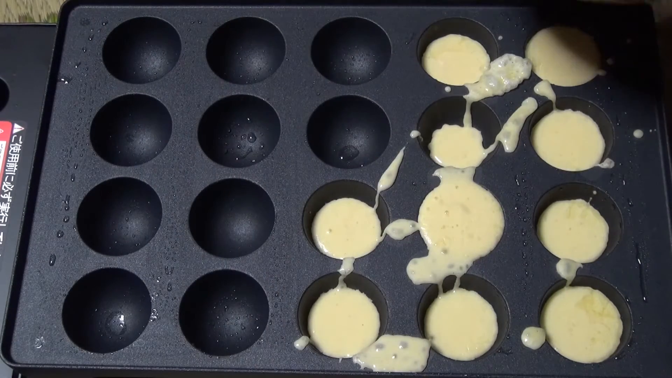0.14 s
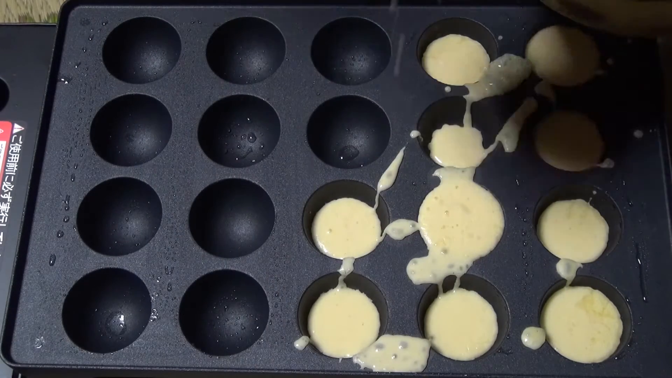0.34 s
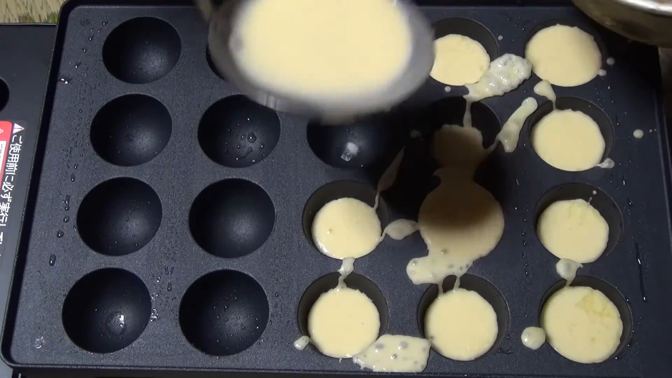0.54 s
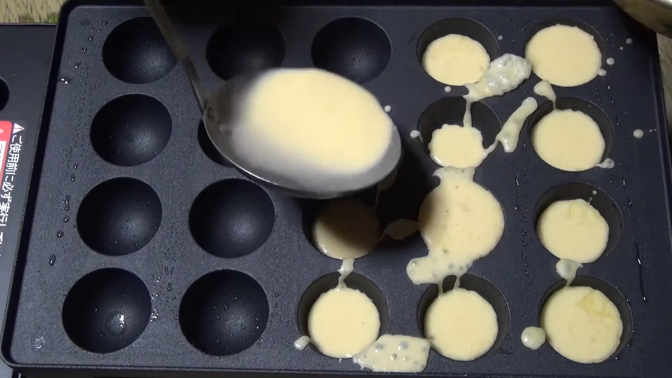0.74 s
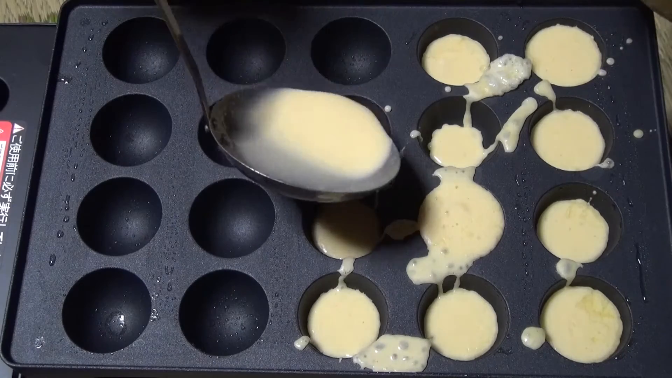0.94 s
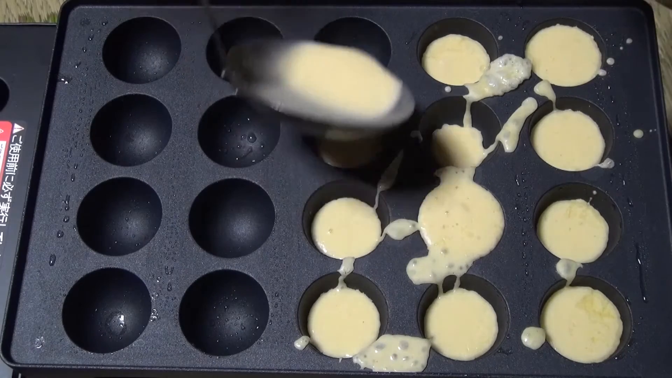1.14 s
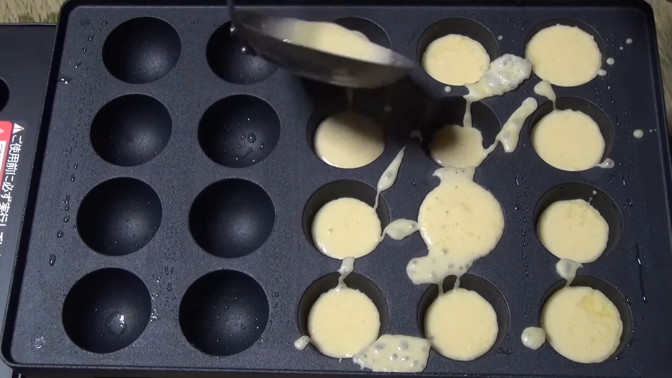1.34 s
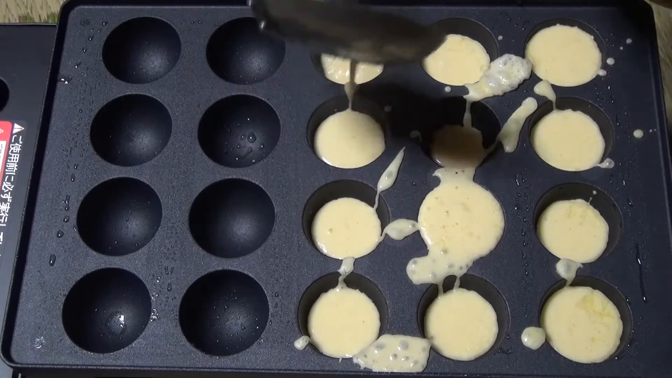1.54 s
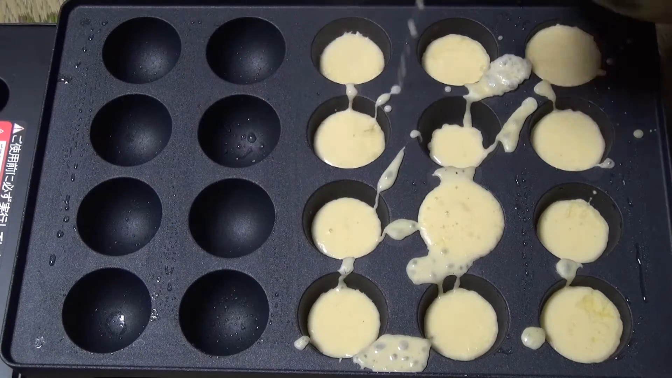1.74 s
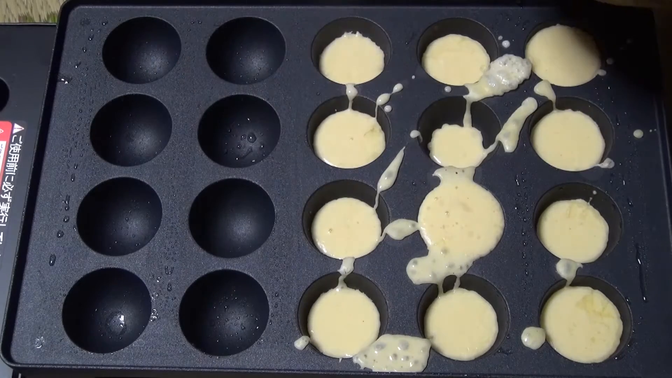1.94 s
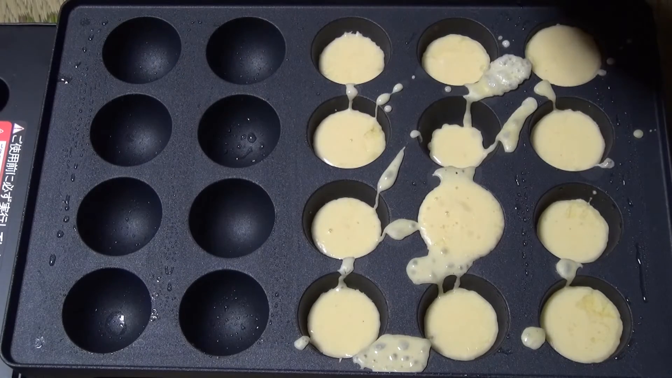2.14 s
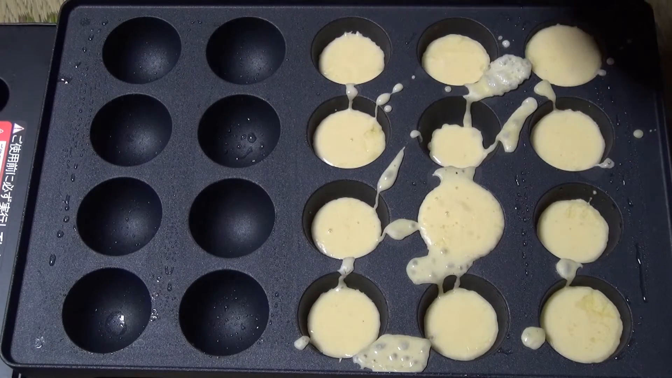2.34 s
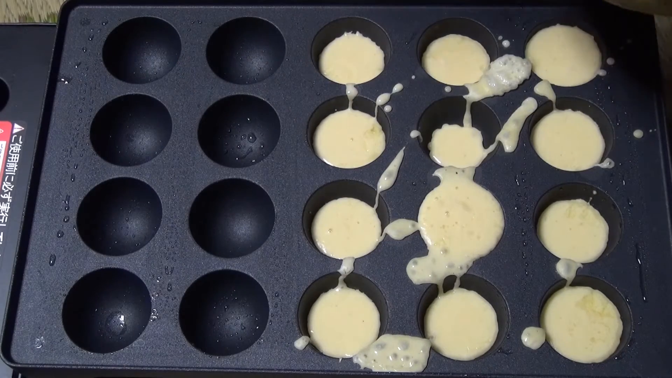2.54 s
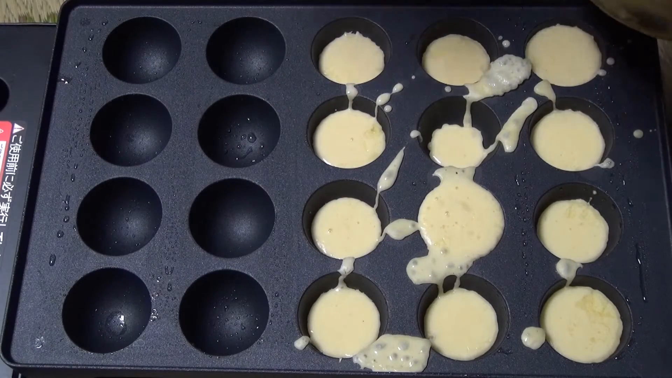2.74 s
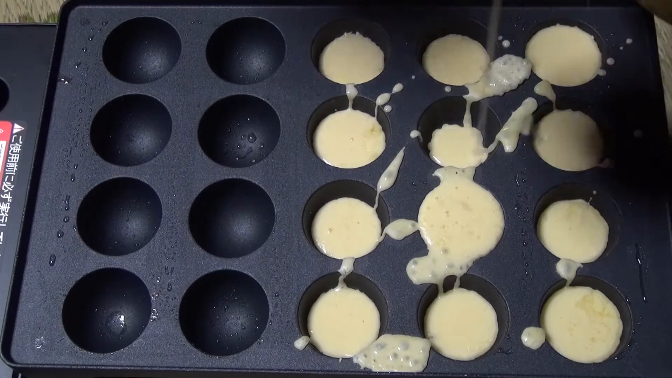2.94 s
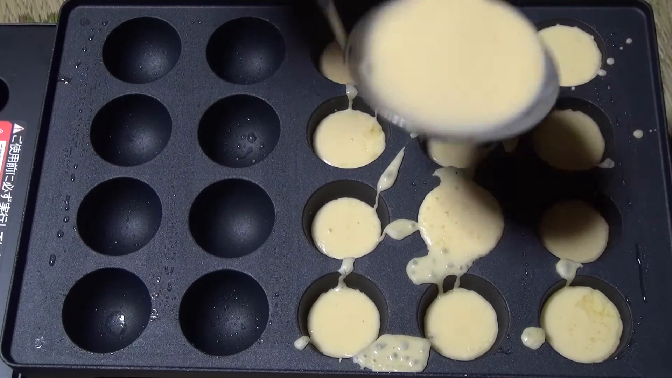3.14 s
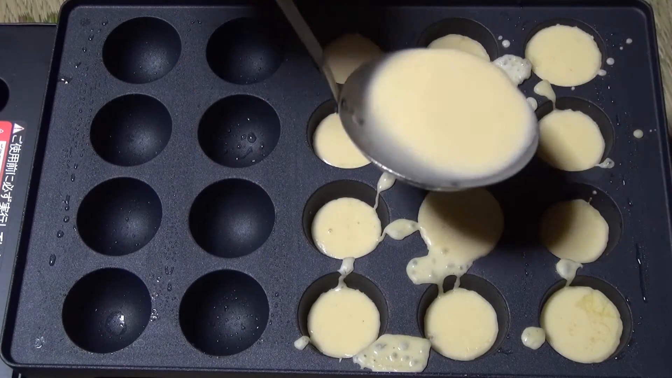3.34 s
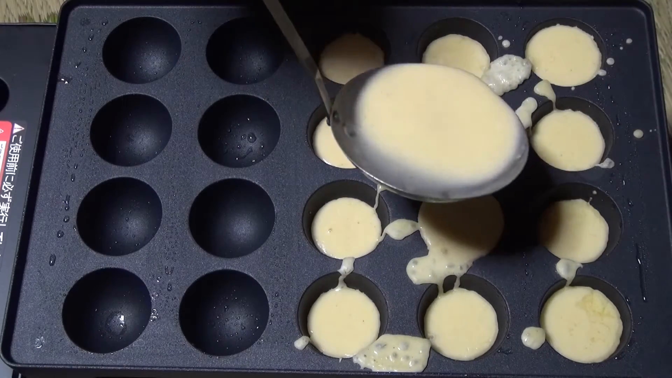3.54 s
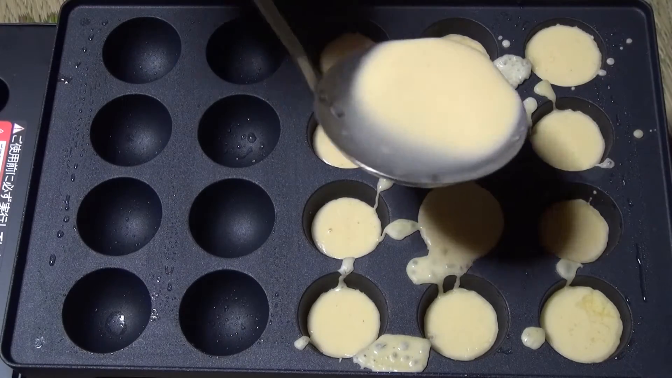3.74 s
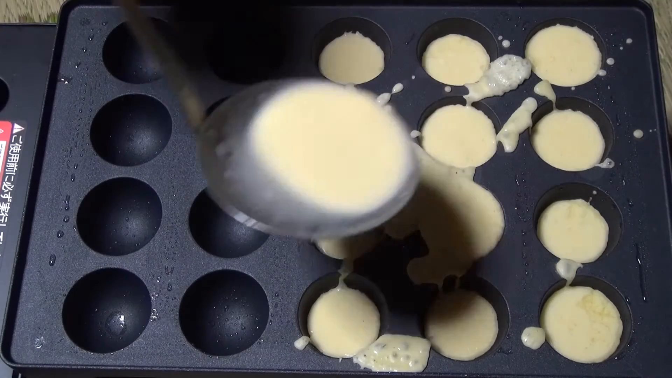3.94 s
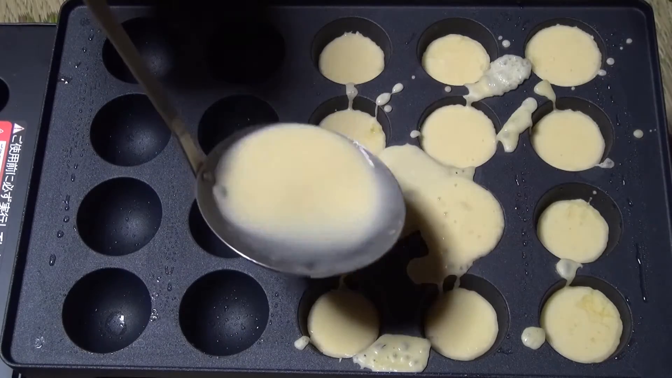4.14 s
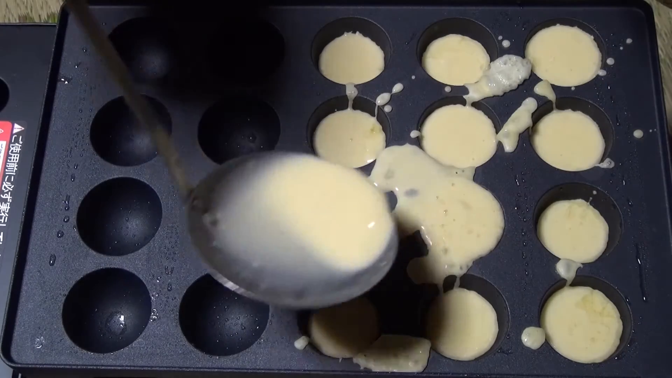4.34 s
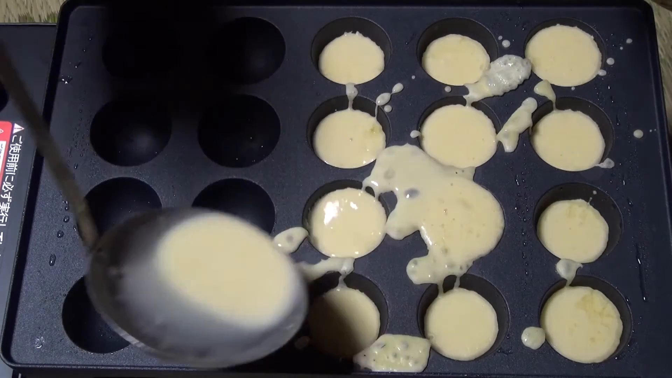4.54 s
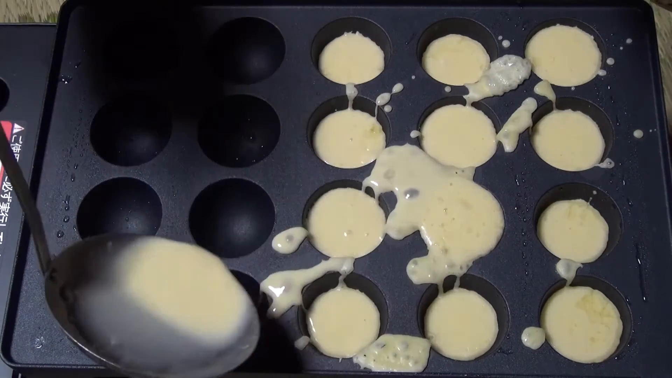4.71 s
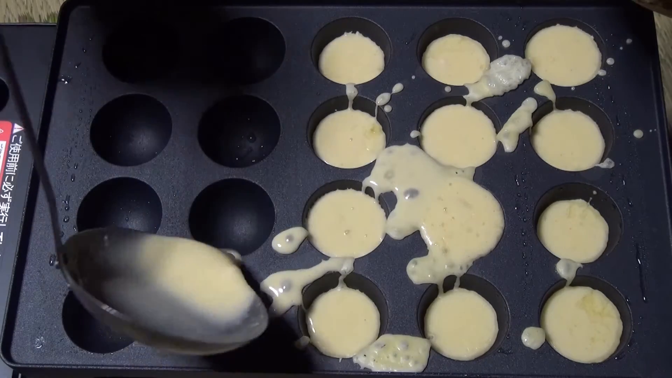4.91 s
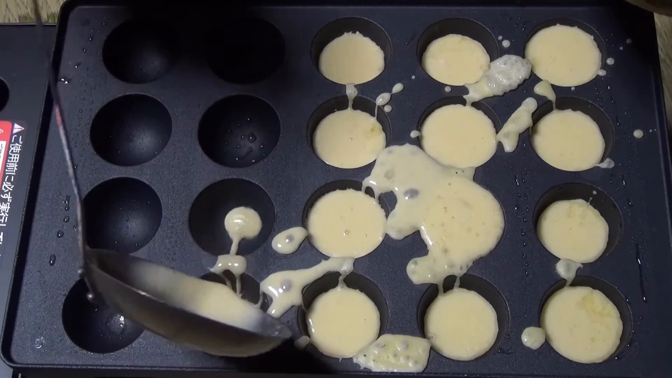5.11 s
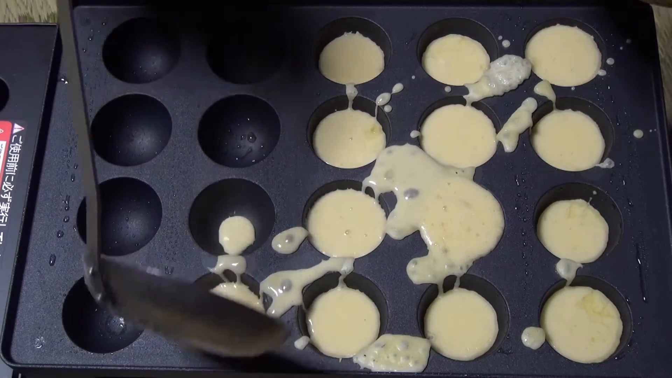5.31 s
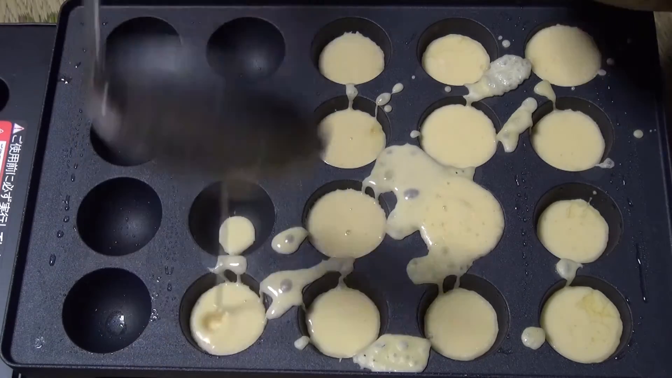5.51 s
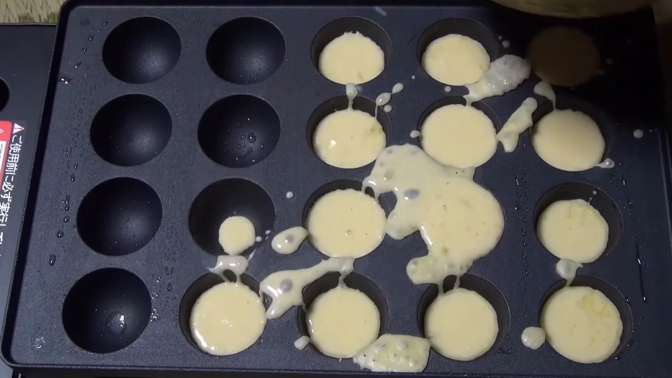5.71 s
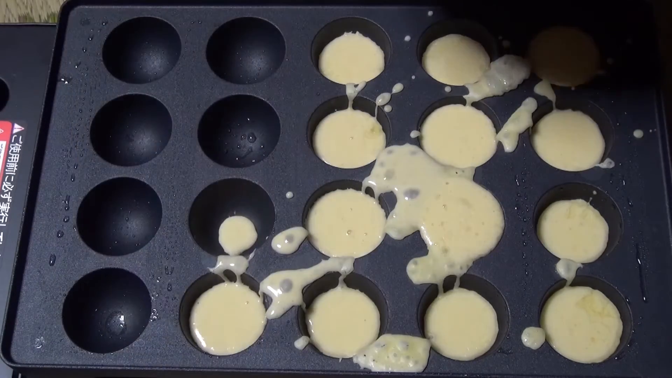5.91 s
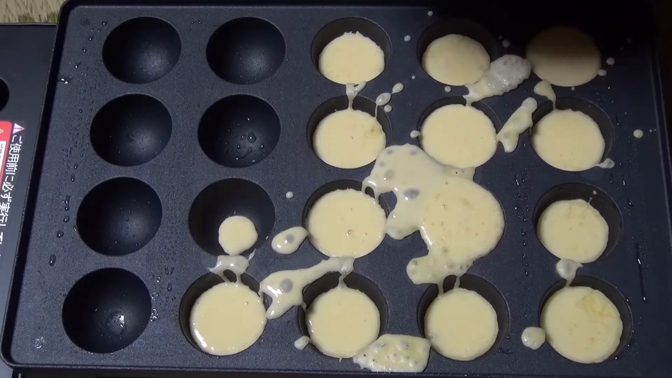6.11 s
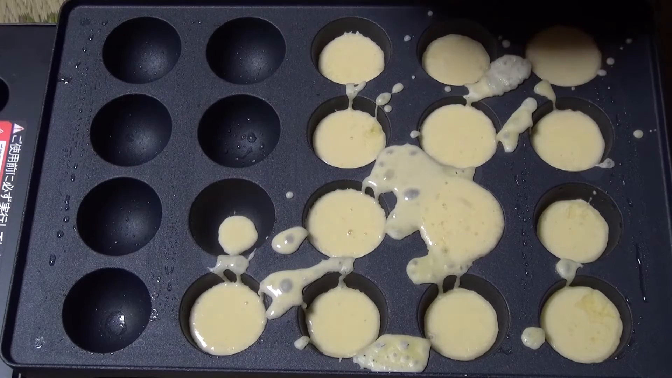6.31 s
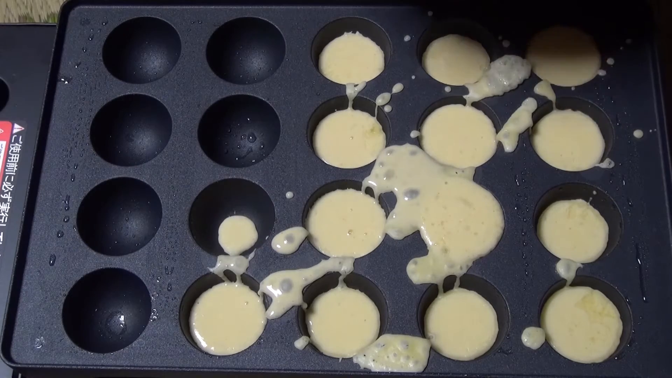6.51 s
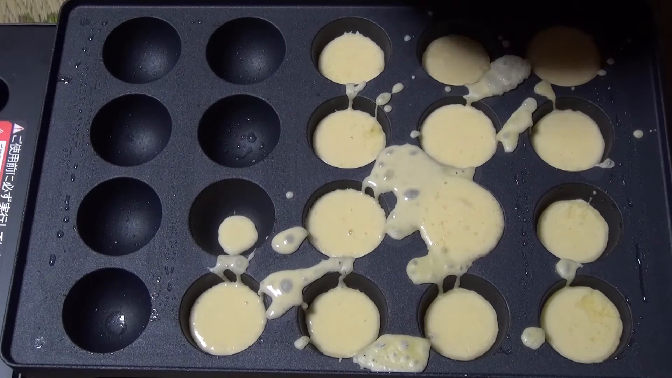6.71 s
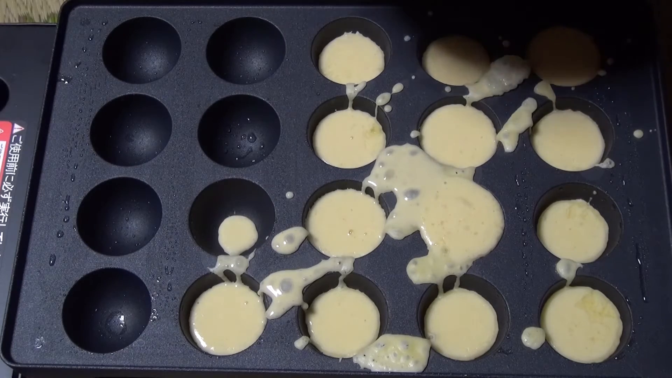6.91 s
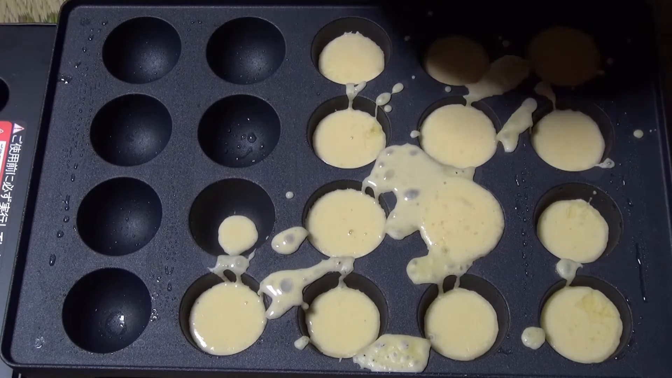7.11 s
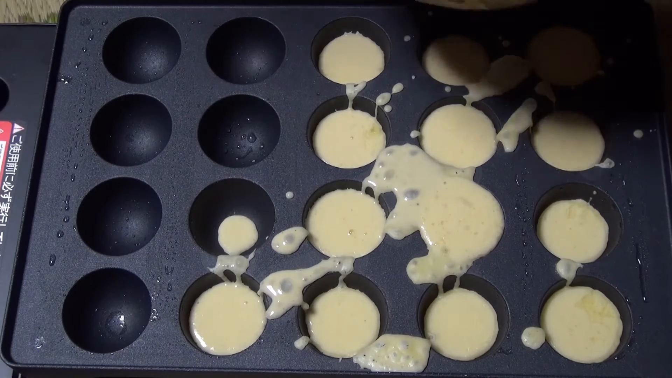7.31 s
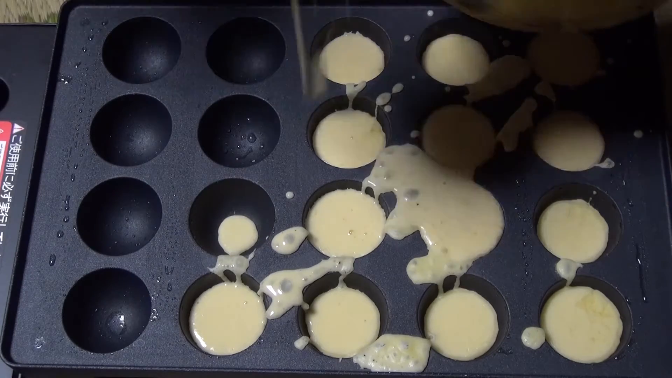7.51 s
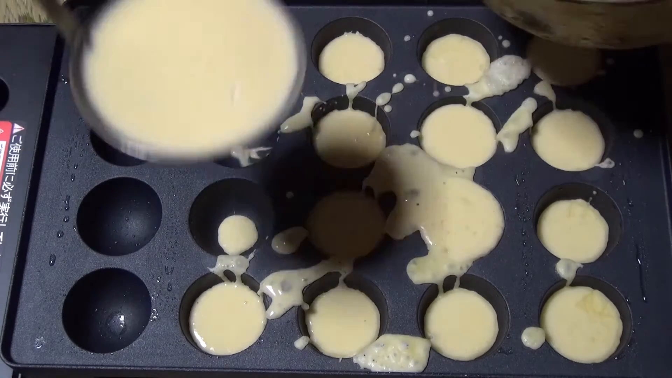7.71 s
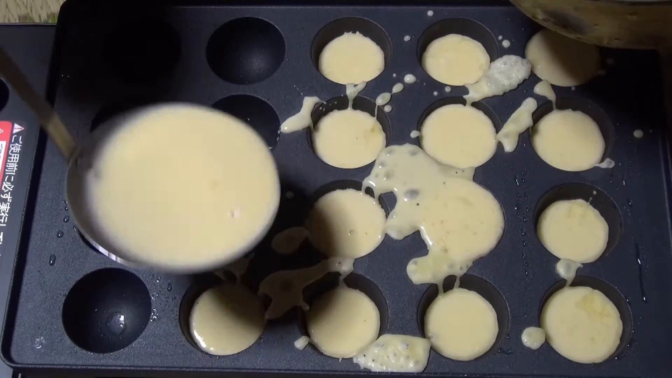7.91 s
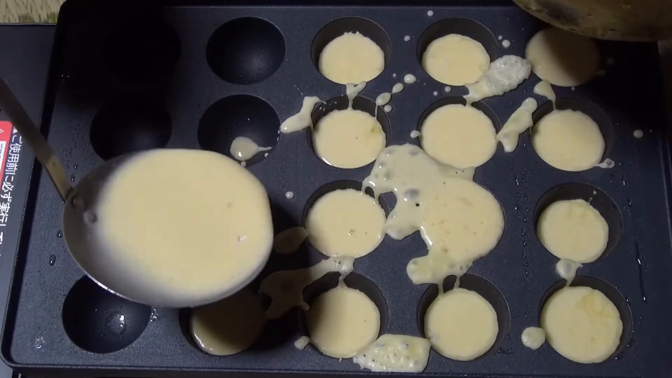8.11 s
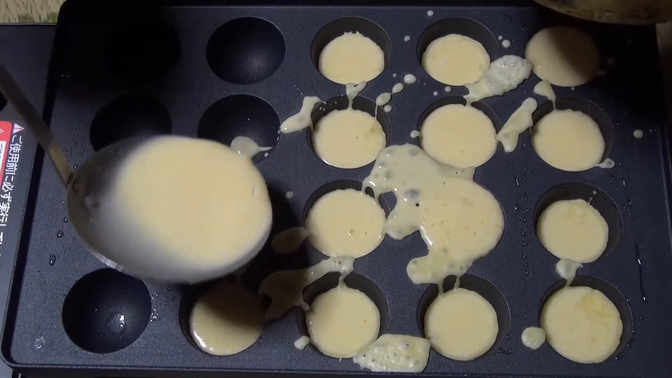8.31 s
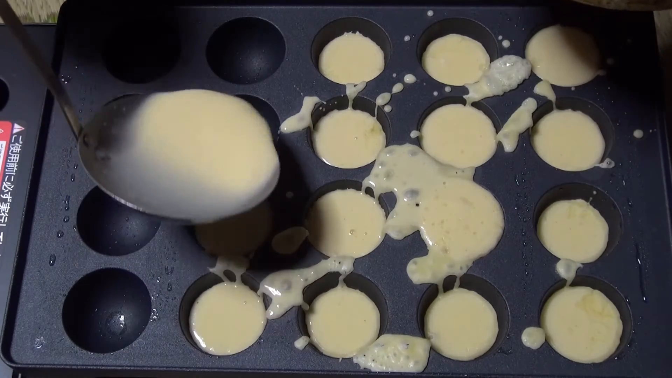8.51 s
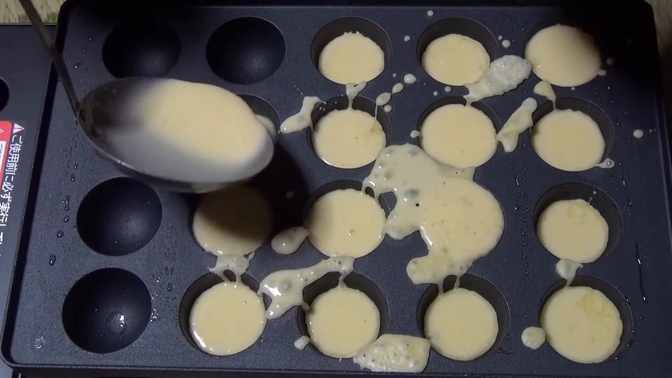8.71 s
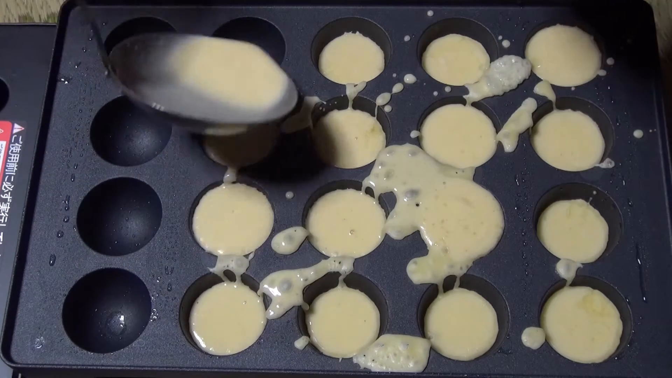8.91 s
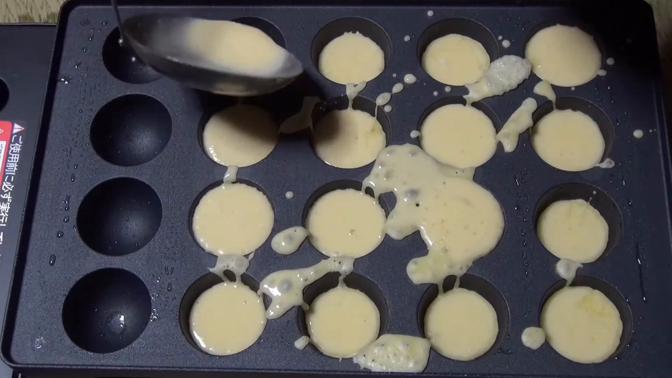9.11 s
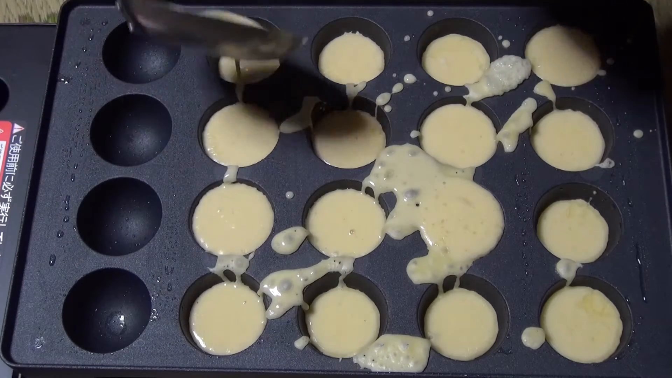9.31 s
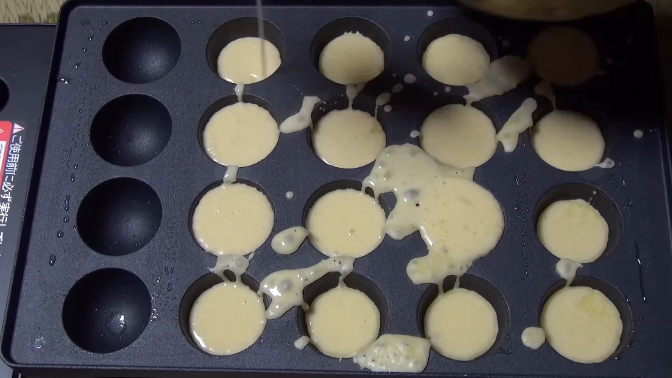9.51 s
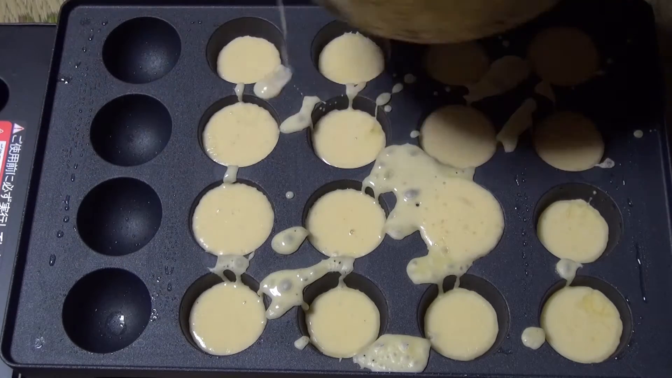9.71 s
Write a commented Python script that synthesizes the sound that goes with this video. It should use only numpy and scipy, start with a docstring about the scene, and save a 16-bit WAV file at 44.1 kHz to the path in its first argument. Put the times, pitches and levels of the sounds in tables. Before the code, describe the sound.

Close to a hot cooking plate in a small kitchen, a fading sizzle surges as batter is poured into oiled cups, then thins to scattered spits. A ladle clanks into a metal bowl and its handle knocks the rim. A second run of pours sizzles, quiet returns with a duller ladle landing and handle knock, then a last wet, fierce sizzle swells. Close, nearly dry microphone, faint low room rumble.

```python
"""A close sizzle is already dying away when batter is ladled into the hot oiled cups of a cooking plate.
Steam bubbles burst as fizz and wet sputter and ring the cups; the sizzle swells with each pour and
thins to single spits of oil. Filtered random bursts make the bubbles, sharp spikes the spits.
The ladle lands in a metal mixing bowl and its handle falls against it, as clicks and decaying modes.
Sparse reflections of a small kitchen and a low rumble lie behind."""
import sys
import numpy as np
from scipy import signal
from scipy.fft import rfft, irfft
from scipy.io import wavfile
from scipy.ndimage import uniform_filter1d

SR = 44100
rng = np.random.default_rng(int(sys.argv[2]) if len(sys.argv) > 2 else 0)


def to_wav(s):
    """Save 16-bit WAV."""
    ch = np.atleast_2d(s).T  # columns
    pcm = np.round(np.clip(ch, -1, 1) * 32767)  # PCM
    wavfile.write(sys.argv[1], SR, pcm.astype(np.int16))


N = 429975  # length in samples


def gain_of(db):
    """Decibels to amplitude."""
    return 10 ** (np.asarray(db) / 20)


def evened(x):
    """Scales to rms 1."""
    return x / np.sqrt(np.mean(x ** 2) + 1e-20)


def read(points, hz):
    """Joins (Hz, value) points on a log-frequency axis."""
    f, value = np.transpose(points)
    return np.interp(np.log(hz + 1), np.log(f + 1), value)


def add(mix, s, sound):
    """Mixes a sound in at a time in seconds."""
    part = mix[max(round(s * SR), 0):][:len(sound)]
    part += sound[:len(part)]


def coloured(x, points):
    """Minimum-phase filter with the given spectrum, so clicks keep their sharp fronts; rms 1."""
    hz = abs(np.fft.fftfreq(8192, 1 / SR))
    log_gain = np.log(gain_of(read(points, hz)))
    response = np.exp(np.conj(signal.hilbert(log_gain)))
    impulse = np.fft.ifft(response).real[:4096]
    return evened(signal.oaconvolve(x, impulse)[:len(x)])


def resonate(x, hz, width):
    """One damped resonance, width in Hz."""
    return signal.lfilter([1], [1, -np.exp((2j * np.pi * hz - np.pi * width) / SR)], x).real


def drift(per_s):
    """Slow random curve of rms 1, straight lines between per_s random points a second."""
    at = np.arange(N) * per_s / SR
    return evened(np.interp(at, np.arange(N // 10), rng.standard_normal(N // 10)))


def click(hz, width, decay_s):
    """A brief broad crack of peak 1 with a sharp front."""
    t = np.arange(SR // 40) / SR
    burst = rng.choice([-1, 1], len(t)) * np.exp(-t / decay_s)
    crack = resonate(np.diff(burst, prepend=0), hz, width)
    return crack / abs(crack).max()


def air():
    """Low room rumble with a faint mains hum."""
    # Spectrum of the kitchen air. Each row: frequency in Hz, relative density in dB per Hz.
    rumble_colour = [(20, -17), (40, -9), (60, -1), (80, 0), (105, 1.5), (150, -1), (210, -6.5),
                     (300, -10.5), (450, -12), (800, -20.5), (3000, -25)]
    rumble_db, hum_hz, hum_db = -54, 59, -68.5  # rms levels
    rumble = gain_of(rumble_db) * coloured(rng.standard_normal(N), rumble_colour)
    hum = np.sqrt(2) * np.sin(2 * np.pi * hum_hz * np.arange(N) / SR)
    return rumble + gain_of(hum_db) * hum


def kitchen(x):
    """Sparse reflections off the kitchen, after a 4 ms gap, each band dying at its own speed."""
    # Reverberation of the room. Each row: frequency in Hz, time to fall 60 dB in seconds.
    room_decay = [(200, 0.1), (1000, 0.23), (4000, 0.17), (14000, 0.042)]
    size = SR // 2
    sparse = rng.random(size) < 3000 / SR  # about 3000 reflections a second
    late = np.arange(size) > .004 * SR
    echoes = rng.standard_normal(size) * sparse * late
    hz, t, z = signal.stft(echoes, SR, nperseg=256)
    fading = gain_of(-60 * t / read(room_decay, hz)[:, None])
    tail = signal.istft(z * fading, SR, nperseg=256)[1]
    return signal.oaconvolve(x, tail / np.linalg.norm(tail))[:N]


def plate_room(x, count=4):
    """Bubbles burst all over the plate, so each reaches the walls by one of several paths."""
    spot = rng.integers(0, count, N // 64 + 1)[np.arange(N) // 64]
    shares = [np.sqrt(abs(uniform_filter1d((spot == k) * 1.0, size=32))) for k in range(count)]
    return sum(kitchen(x * share) for share in shares)


def taps():
    """Soft contacts of ladle and batter: one damped tone with a short scuff round it."""
    # Light taps and plops. Each row: start in seconds, level in dB before the tone and scuff shares,
    # pitch in Hz, time to fall 60 dB in seconds.
    soft_contacts = [(1.155, -24.5, 900, .018), (2.143, -32, 686, 0.054), (2.951, -36, 390, .06),
                     (3.84, -22, 1100, 0.015), (5.156, -17.5, 920, .016), (6.6839, -16.5, 1585, 0.025),
                     (6.995, -38, 350, 0.063)]
    out, t = np.zeros(N), np.arange(SR // 4) / SR
    for s, db, hz, t60 in soft_contacts:
        narrowed = resonate(rng.standard_normal(len(t)), hz, 0.65 * hz)
        narrowed = resonate(narrowed, hz, 0.65 * hz)
        scuff = evened(narrowed) * np.exp(-t / .007)
        tone = np.sin(2 * np.pi * hz * t)
        add(out, s, gain_of(db - 60 * t / t60) * (0.33 * tone + 0.12 * scuff))
    return out


def clinks(blows, modes, click_s, clatter_t60):
    """Each blow is a metal click, a short clatter and the body's modes, weighted by the place hit."""
    # Crowded weak modes of thin metal. Each row: frequency in Hz, relative density in dB per Hz.
    clatter_colour = [(150, -23), (300, 1.5), (1000, 2.5), (1500, -5), (2400, 6), (4000, 5), (8000, -37),
                      (15000, -11)]
    out, t = np.zeros(N), np.arange(SR // 2) / SR
    for s, db, place, ring, click_db, click_hz, clatter_db in blows:
        add(out, s, gain_of(click_db) * click(click_hz, width=1700, decay_s=click_s))
        clatter = coloured(rng.standard_normal(len(t)), clatter_colour)
        add(out, s, gain_of(clatter_db - 60 * t / clatter_t60) * clatter)
        for hz, t60, first_db, second_db in modes:
            mode_db = db + first_db + (second_db - first_db) * np.clip(place, 0, 1)
            decay = gain_of(mode_db - 60 * t / (ring * t60))
            swell = 1 - np.exp(-t * hz / 0.5)  # low modes take longer to get going
            add(out, s, decay * swell * np.sin(2 * np.pi * hz * t))
    return out


def ladle_landings():
    """The ladle drops into the bowl and rings in its own modes."""
    # Modes of the ladle. Each row: frequency in Hz, time to fall 60 dB in seconds before the ring factor,
    # relative level in dB struck on the lip, relative level in dB struck on the belly.
    ladle_modes = [(578, 0.28, -67, -38), (800, 0.21, -43, -29.5), (874, 0.25, -38.5, -38),
                   (1305, 0.13, -38, -36), (1554, 0.059, -35, -31), (1565, 0.1, -23.5, -46),
                   (1670, 0.042, -27, -29), (2120, 0.3, -36, -53), (2190, 0.045, -31, -26),
                   (2350, 0.029, -17.5, -29), (2400, 0.18, -31, -50), (2950, 0.08, -25, -52),
                   (3480, .03, -41, -22), (3850, 0.062, -26.5, -38), (7100, .03, -20, -60)]
    # Landings. Each row: start in seconds, level of the modes in dB, place from 0 lip to 1 belly,
    # ring time factor, click peak in dB, click centre in Hz, starting clatter level in dB.
    landings = [(2.366, 1.5, 0.076, 0.95, -8.5, 4940, -27.5), (6.0212, 2, 0.85, 0.87, -28, 2600, -47)]
    return clinks(landings, ladle_modes, click_s=0.0028, clatter_t60=0.18)


def handle_knocks():
    """The ladle's handle falls against the bowl, which rings in its modes."""
    # Modes of the bowl. Each row: frequency in Hz, time to fall 60 dB in seconds before the ring factor,
    # relative level in dB struck on the rim, relative level in dB struck on the wall.
    bowl_modes = [(242, 0.044, -48, -34), (365, 0.06, -40, -24.5), (475, 0.34, -28, -32),
                  (510, 0.063, -30, -17.5), (730, 0.23, -44, -39.5), (832, 0.2, -41, -38),
                  (930, 0.16, -48, -32), (1520, 0.059, -17.5, -42), (1556, 0.044, -16, -28),
                  (1610, .13, -43, -37), (2067, 0.2, -23.5, -57.5), (2215, 0.097, -27, -43.5),
                  (2290, 0.04, -34.5, -19), (2950, 0.098, -31, -37.5), (3640, 0.026, -22, -25),
                  (4600, 0.021, -24, -20), (6900, 0.014, -23, -36)]
    # Knocks. Each row: start in seconds, level of the modes in dB, place from 0 rim to 1 wall,
    # ring time factor, click peak in dB, click centre in Hz, starting clatter level in dB.
    knocks = [(2.5922, 1, 0.058, 0.92, -17.5, 2500, -23), (6.3292, -2.5, 1, 0.9, -9.5, 4500, -23.5)]
    return clinks(knocks, bowl_modes, click_s=0.0017, clatter_t60=0.062)


def spits():
    """Drops of water explode in the oil: a sharp pressure spike with a fainter ring of the cup."""
    # The loudest single spits. Each row: start in seconds, peak of the spike in dB, centre in Hz.
    loud_spits = [(0.3521, -12.5, 5850), (0.798, -9.5, 10200), (2.404, -11, 9640), (2.7797, -14, 9720),
                  (4.3646, -10, 9430), (6.4234, -16, 10100), (6.817, -19, 8160), (6.9388, -15.5, 8200),
                  (7.213, -18, 8270), (7.6034, -20.5, 9460)]
    # Range of the small spits: lowest and highest centre in Hz.
    low_hz, high_hz = (5000, 10300)
    small_per_s, small_db, spread_db = 11, -24, 4  # small ones come at random, within 4 dB either way
    ring_db = -7  # the cup's ring against the spike
    small_spits = []
    for when, size, pitch in rng.random((round(small_per_s * N / SR), 3)):
        level_db = small_db + spread_db * (2 * size - 1)
        small_spits.append((when * N / SR, level_db, low_hz + (high_hz - low_hz) * pitch))
    out, spike = np.zeros(N), signal.unit_impulse(SR // 100)
    for s, db, hz in loud_spits + small_spits:
        snap = resonate(np.diff(spike, prepend=0), hz, 3400)
        add(out, s, gain_of(db) * snap / abs(snap).max())
        add(out, s, gain_of(db + ring_db) * click(hz=3940, width=1700, decay_s=0.0014))
    return out


def bubbles(per_s, spread_db, clump_db, wash, burst_s, count=16):
    """Bursting bubbles of chance sizes, in flurries, over the wash of those too small to tell apart."""
    flurry = gain_of(clump_db * evened(drift(22) + drift(90) + drift(300)))
    growth = np.minimum(rng.exponential(1, N), 5.2)
    sizes = gain_of(spread_db * growth) * (rng.random(N) < per_s / SR)
    kind, t = rng.integers(0, count, N), np.arange(SR // 200) / SR
    shapes = rng.standard_normal((count, len(t))) * np.exp(-t / burst_s)  # each film tears in its own way
    shapes += 2.2 * (t == 0)  # after a sharp first snap
    shapes = [evened(shape) for shape in shapes]
    pops = sum(signal.oaconvolve(sizes * (kind == k), shape)[:N] for k, shape in enumerate(shapes))
    mean_colour = np.sqrt(np.mean(abs(rfft(shapes, N)) ** 2, axis=0))
    pops = irfft(rfft(pops) / mean_colour, N)  # white taken together
    return evened(flurry * (evened(pops) + wash * rng.standard_normal(N)))


def hollows():
    """Bubbles inside a half-closed pocket of air take on its pitch, which rises until it fills."""
    # Hollows between batter, cup and ladle. Each row: start in seconds, end in seconds, starting pitch
    # in Hz, width in Hz of each of two stacked resonances, rms level in dB before the fades.
    pockets = [(0.4, 1.36, 3520, 260, -43), (0.776, 1.25, 2930, 380, -43), (1.22, 2.397, 2670, 550, -50),
               (3.294, 3.838, 654, 500, -51.5), (3.424, 3.8, 5300, 700, -40.5),
               (3.95, 4.65, 3040, 380, -47.5), (4.56, 5.0, 3980, 800, -44),
               (4.716, 5.66, 7690, 1100, -38.5), (7.62, 8.3, 3190, 300, -44.5),
               (8.08, 9.1, 1830, 520, -48.5), (9.03, 9.33, 2300, 1400, -38.5),
               (9.03, 9.5, 2950, 900, -44.5), (9.25, 9.85, 4450, 1100, -38.5)]
    rise_per_s = .11  # share by which the pitch climbs as the hollow shrinks
    out = np.zeros(N)
    steam = bubbles(per_s=2300, spread_db=-3.0, clump_db=2.9, wash=0.97, burst_s=0.00037)
    for start, end, hz, width, db in pockets:
        drive = steam[round(start * SR):round(end * SR)]
        pitch = hz * (1 + rise_per_s * np.arange(len(drive)) / SR)
        turn = np.exp(2j * np.pi * np.cumsum(pitch) / SR)
        r = np.exp(-np.pi * width / SR)
        # shift the pitch down to zero, resonate there, shift back up
        ring = (turn * signal.lfilter([1], np.poly([r, r]), drive / turn)).real
        add(out, start, gain_of(db) * evened(ring) * signal.windows.tukey(len(ring), .5))
    return out


def boil():
    """Gain of each bubble kind: dollops boil up, hold, then drop to a simmer; their powers add."""
    # Dollops of batter meeting hot oil. Each row: start in seconds, spreading time in seconds, hold in
    # seconds, simmer fade in dB per second, then full-boil levels in dB before the waver: fine fizz,
    # ring of the far cups, ring of the near cup, wet sputter.
    dollops = [(-0.35, .01, .01, 8, -31.5, -39.5, -41.5, -43.5), (0.472, .02, .25, 4, -35, -44, -47, -50),
               (0.674, 0.27, 0.16, 7.5, -29, -34, -44, -41.5), (1.04, 0.1, 0.24, 7, -27, -56, -54, -40.5),
               (1.28, 0.09, 0.24, 7, -32.5, -32, -37.5, -41.5),
               (2.72, .06, 0.088, 35.5, -37, -43, -56, -58), (3.106, .05, 0.042, 3, -46, -53, -51, -48.5),
               (3.33, .05, 0.22, 3, -39, -42.5, -51, -42), (3.47, 0.14, 0.044, 4.5, -34, -39, -56, -43),
               (4.04, 0.059, 0.33, 7, -31.5, -43.5, -46.5, -44),
               (4.533, .02, 0.047, 5, -32.5, -41, -46, -41),
               (4.612, 0.047, 0.55, 8.5, -31, -46, -36.5, -44),
               (5.022, 0.07, 0.19, 9, -28.5, -35.5, -33.5, -42),
               (7.598, 0.008, 0.14, 0, -37, -45.5, -54, -47.5),
               (7.67, 0.25, 0.13, 5.5, -29.5, -39.5, -40, -44),
               (8.161, 0.071, .04, 8.5, -26, -37, -35, -33.5), (8.407, .1, .1, 19, -40, -43, -36.5, -41),
               (8.645, .1, 0.09, 17.5, -25, -36, -39, -35.5),
               (9.07, .01, 0.28, 5.5, -26.5, -35, -35.5, -44.5), (9.66, .05, .1, 7, -37, -46, -52, -58)]
    # Start of the simmer against the full boil, in dB: fizz, far cups, near cup, sputter.
    simmer_start_db = [-3, -3.5, -3.5, -4.1]
    splash_db_per_s = 68  # the first fierce boil dies this fast once the batter has set
    waver_db, waver_per_s = 0.62, 9  # each kind of bubble comes and goes a little by itself
    t, power = np.arange(0, N, 64) / SR, 0
    simmer = np.minimum(gain_of(simmer_start_db), 1)[:, None] ** 2
    for s, spread_s, hold_s, fade_db_per_s, *levels_db in dollops:
        wetted = np.clip((t - s) / spread_s, 0, 1)
        age = np.maximum(t - s - spread_s - hold_s, 0)
        splash_left = (1 - simmer) * gain_of(-splash_db_per_s * age) ** 2
        simmer_left = simmer * gain_of(-fade_db_per_s * age) ** 2
        power = power + gain_of(levels_db)[:, None] ** 2 * wetted * (splash_left + simmer_left)
    gains = []
    for p in power:
        smooth = np.interp(np.arange(N) / SR, t, np.sqrt(p))
        gains.append(smooth * gain_of(waver_db * drift(waver_per_s)))
    return gains


def sizzle():
    """Small bubbles fizz and ring the cups; larger ones sputter where wet batter meets hot oil."""
    # Colours of the bubbles: fine fizz, ring of the far cups, ring of the near cup, wet sputter and the
    # gurgle under deep batter. Each row: frequency in Hz, relative density in dB per Hz.
    fizz_colour = [(1500, -51.5), (3500, -10), (5800, -7.5), (7000, -6.5), (8300, -2.5), (9300, -0.5),
                   (9950, 1), (10700, -4), (11500, -9.5), (12400, -4.5), (13400, -2), (15000, -5)]
    far_colour = [(3300, -34), (4200, -5.5), (4650, -2), (5050, 1), (5500, -2.5), (6100, -6.5), (7200, -19)]
    near_colour = [(2400, -46), (3050, -3), (3330, 1.5), (3800, 4.5), (4200, 3), (4550, -4), (5500, -36)]
    sputter_colour = [(100, -27.5), (220, -11.5), (380, -18.5), (600, -2.5), (800, -2.5), (1050, 0),
                      (1400, -0.5), (1800, 1), (2300, 1), (2700, 2), (3200, -5.5), (4500, -7), (9000, -21)]
    deep_colour = [(90, -21), (170, 5.5), (260, 0.5), (380, -9.5), (520, 3.5), (700, 11.5), (1100, -17.5),
                   (3000, -29)]
    fizz_gain, far_gain, near_gain, wet_gain = boil()
    small = bubbles(per_s=3500, spread_db=3.0, clump_db=1.05, wash=1.0, burst_s=0.00027)
    middle = bubbles(per_s=2500, spread_db=2.5, clump_db=1.03, wash=0.53, burst_s=0.00055)
    large = bubbles(per_s=1500, spread_db=2.5, clump_db=1.5, wash=0.7, burst_s=0.00065)
    fizz = fizz_gain * coloured(small, fizz_colour)
    far = far_gain * coloured(middle + 0.24 * small, far_colour)
    near = near_gain * coloured(large + 0.97 * small, near_colour)
    sputter = wet_gain * coloured(large + 0.72 * middle, sputter_colour)
    # steam trapped under deep batter gurgles mostly at the height of a pour: steeper than the sputter
    deep_gain = gain_of(-48.5) * (wet_gain / gain_of(-34.5)) ** 1.87
    deep = deep_gain * coloured(large, deep_colour)
    return fizz + far + near + sputter + deep


def thinned(x):
    """A band thins out under the ladle and comes back at once as fresh batter lands."""
    # Dips in the sizzle. Each row: start in seconds, end in seconds, centre in Hz, width in Hz,
    # deepest gain in dB.
    band_dips = [(0.95, 1.3, 2800, 1500, -4.5), (3.9, 4.62, 2350, 700, -6.5), (8.3, 9.066, 3050, 1000, -8)]
    return_s = 0.0095
    t, out = np.arange(N) / SR, x
    for start, end, hz, width, db in band_dips:
        closed = np.interp(t, [start, end, end + return_s], [0, 1, 0])
        band = signal.lfilter(*signal.iirpeak(hz, hz / width, SR), x)
        out = out - (1 - gain_of(db * closed)) * band
    return out


def scene():
    """Plate and metal stand close and nearly dry before the microphone; all sits in the centre."""
    plate = thinned(sizzle() + hollows()) + spits()
    metal = ladle_landings() + handle_knocks() + taps()
    room = gain_of(-12) * plate_room(plate) + gain_of(-15) * kitchen(metal)
    mono = plate + metal + room + air()
    return np.array([mono, mono])


def record(dry):
    """The recorder's band limit, a steep low-pass."""
    edge_hz = 15150
    low_pass = signal.firwin(701, edge_hz, window=("kaiser", 9), fs=SR)
    return signal.oaconvolve(dry, low_pass[None], "same")


dry = scene()
out = record(dry)
to_wav(out)
```